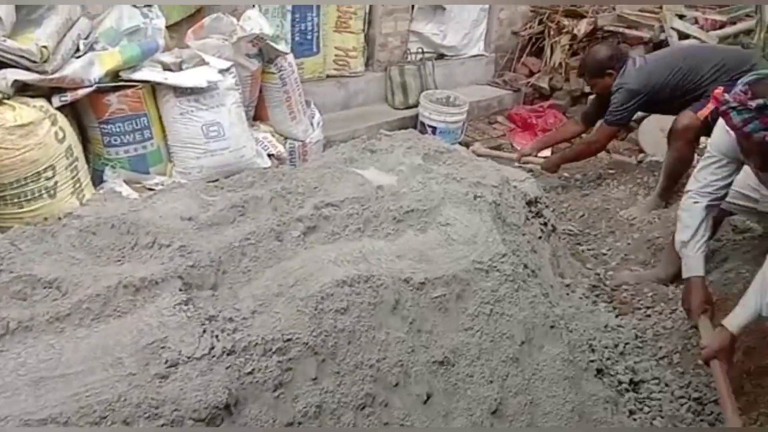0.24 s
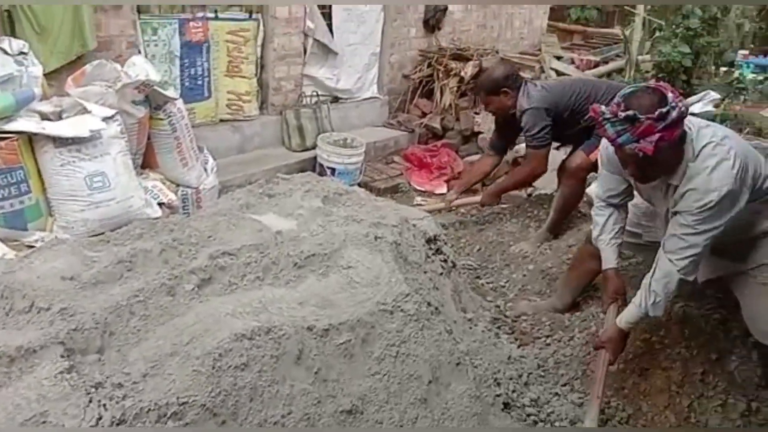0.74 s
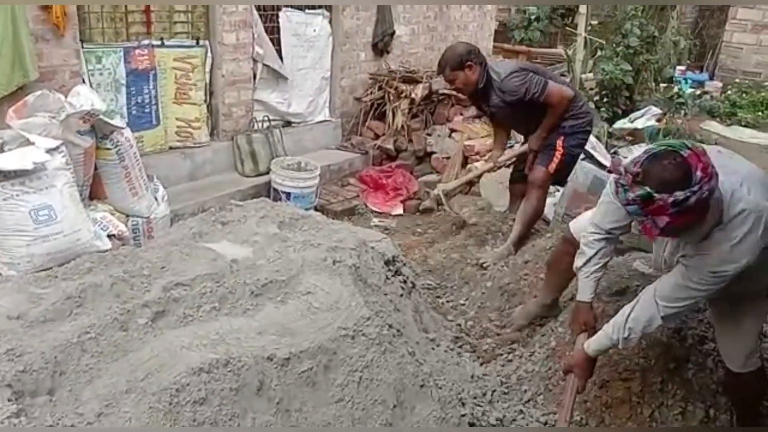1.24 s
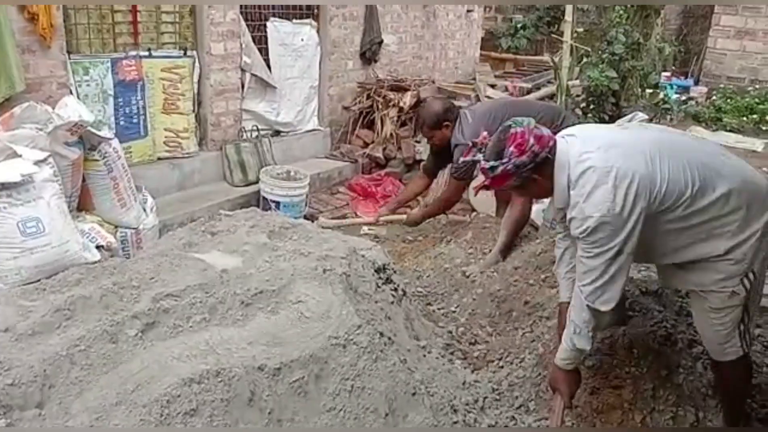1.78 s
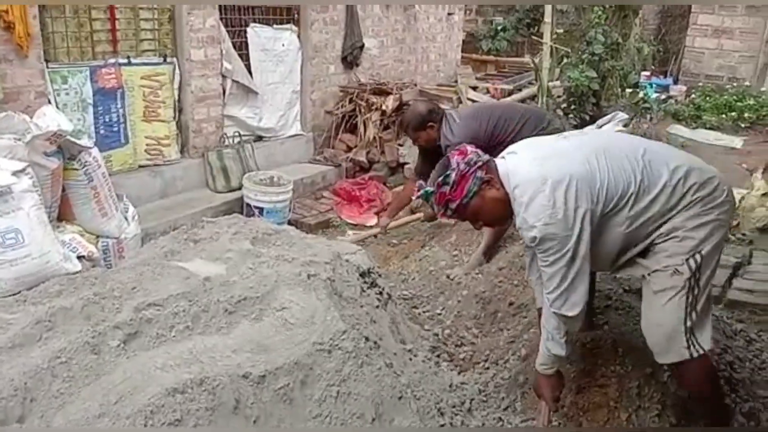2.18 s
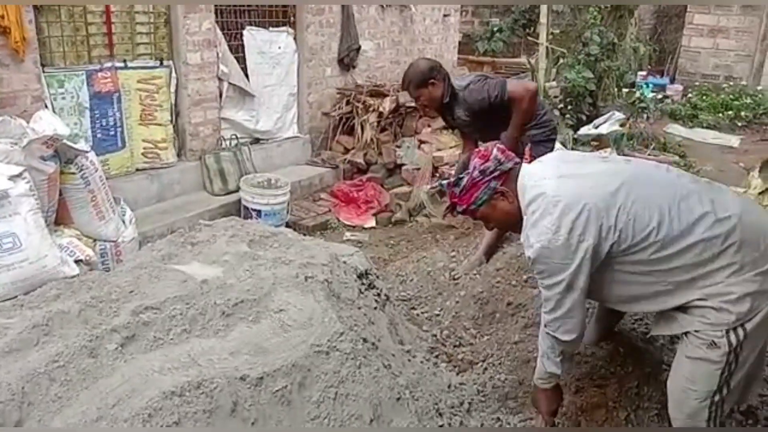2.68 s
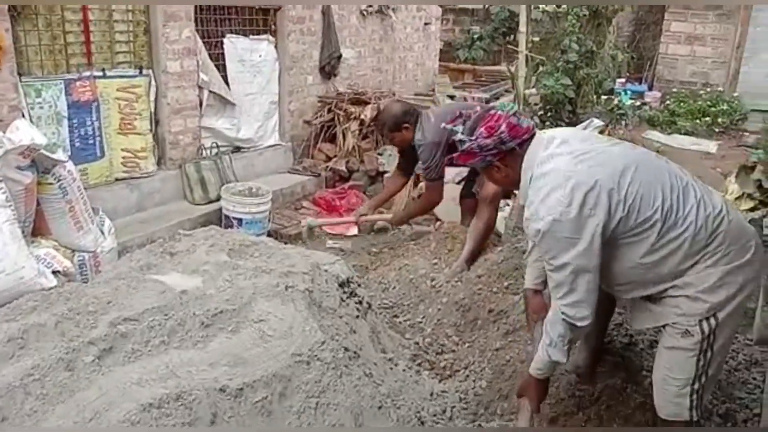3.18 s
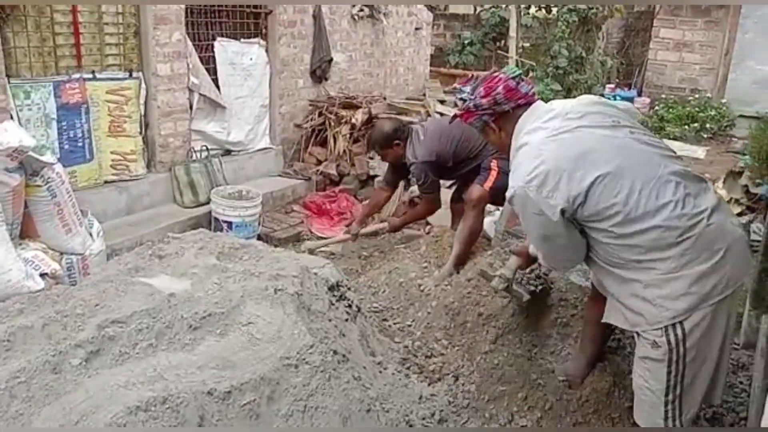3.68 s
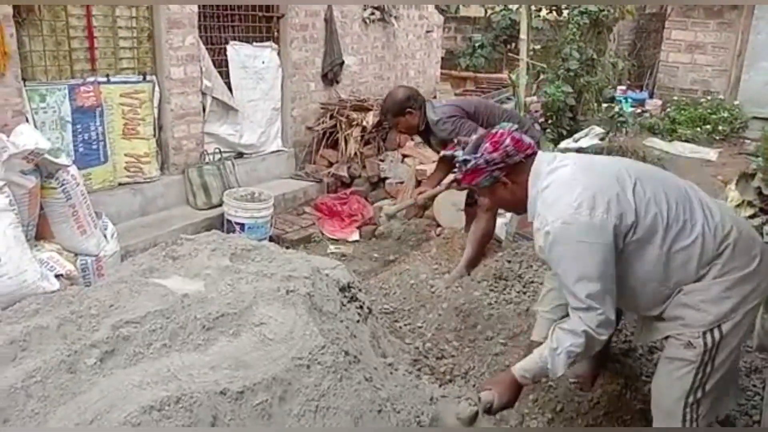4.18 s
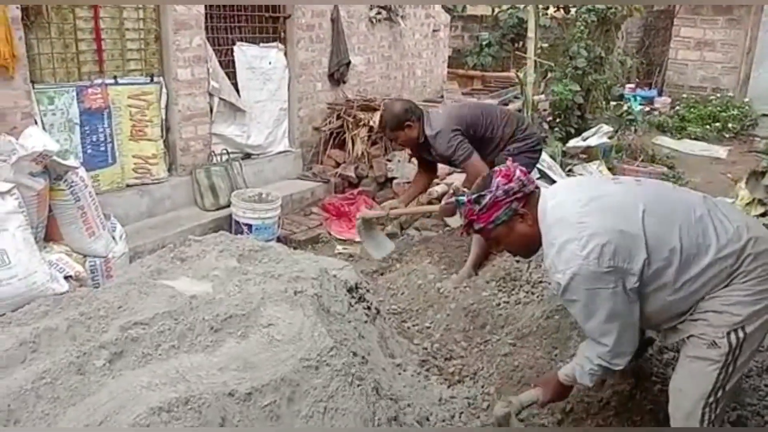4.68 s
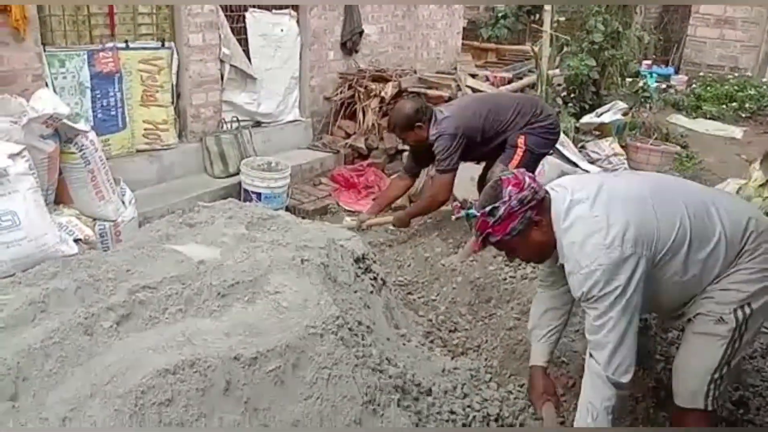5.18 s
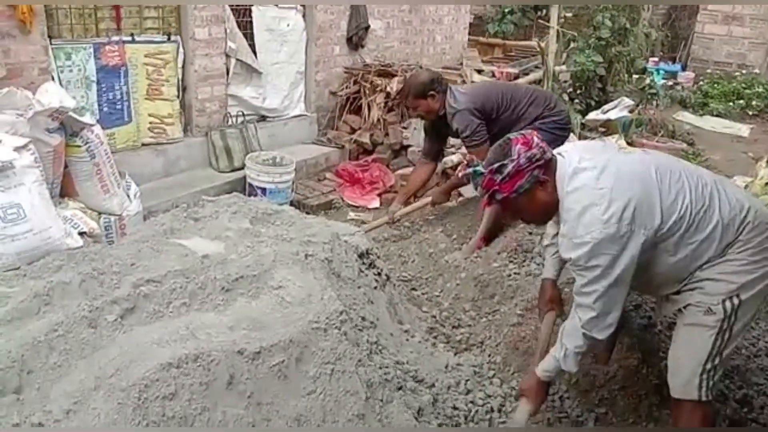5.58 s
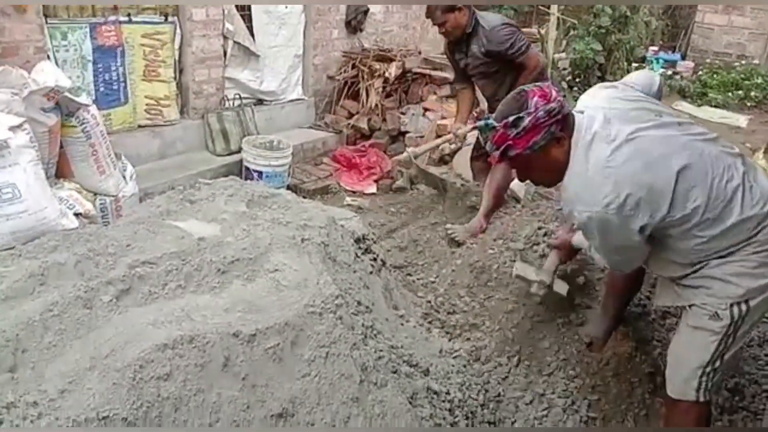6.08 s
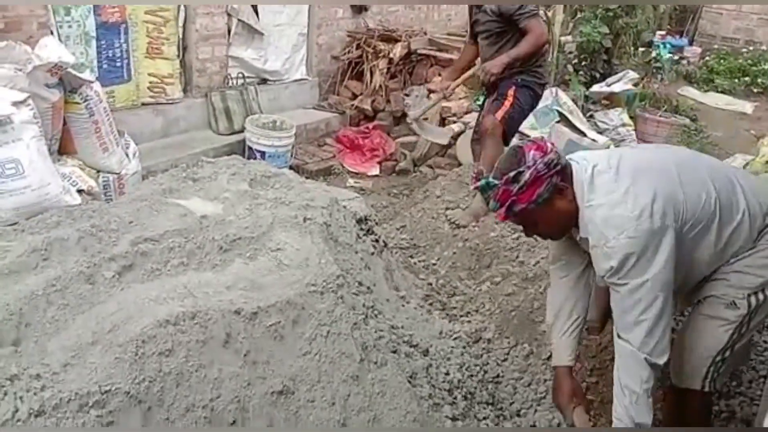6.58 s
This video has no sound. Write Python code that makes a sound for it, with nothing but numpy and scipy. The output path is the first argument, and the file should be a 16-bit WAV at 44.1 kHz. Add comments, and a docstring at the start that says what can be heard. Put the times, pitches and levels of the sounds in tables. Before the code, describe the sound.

Steel spades bite and grind through stone chips and sand in uneven strokes, with bright metallic knocks early on and gritty spills onto the heap.

```python
"""A walled yard, where two steel spades turn a heap of stone chips, sand and cement.
Each stroke bites in, grinds chips across the loaded blade (stick-slip noise through the blade's
resonances) and tips them onto the heap (dying showers of contacts), with dull blows in the ground.
Early on a bare blade is knocked three times and rings as a sum of modes; a late knock is damped.
Single chips skip on the steel, loose ones tick throughout, and the walls answer diffusely."""
import sys
import numpy as np
from scipy import signal
from scipy.fft import rfft, irfft, next_fast_len
from scipy.io import wavfile
from scipy.ndimage import uniform_filter1d, minimum_filter1d, map_coordinates

SR = 44100
rng = np.random.default_rng(int(sys.argv[2]) if len(sys.argv) > 2 else 0)


def bounce(signal):
    """Save signal as a 16-bit WAV file at the path given by the first command-line argument."""
    frames = np.transpose(np.atleast_2d(signal))
    limited = np.clip(frames, -1, 1)
    pcm = np.round(limited * 32767).astype(np.int16)
    wavfile.write(sys.argv[1], SR, pcm)


N = 301644
TIME = np.arange(N) / SR  # s


def amp(db):
    """Decibel law: the amplitude factor of a level in dB."""
    return 10 ** (np.asarray(db) / 20)


def unit(x):
    """Normalization of the power: x scaled to rms 1."""
    return x / np.sqrt(np.mean(x ** 2) + 1e-20)


def along(points, hz):
    """Logarithmic frequency scale: interpolates (frequency [Hz], value) points on it."""
    f, v = np.transpose(points)
    return np.interp(np.log(hz + 1), np.log(f + 1), v)


def wobble(rate, n):
    """Random modulation: a wandering curve through rate random knots a second."""
    knots = 1.15 * rng.standard_normal(int(n * rate / SR) + 2)
    return np.interp(np.arange(n) * rate / SR, np.arange(len(knots)), knots)


def coloured(x, gain):
    """Minimum-phase filtering: x through the causal filter with the given gain of frequency."""
    m = 2 * next_fast_len(len(x) // 2 + SR // 20)
    log_gain = np.log(np.maximum(gain(np.fft.rfftfreq(m, 1 / SR)), 1e-6))
    # folding the cepstrum onto positive times makes the filter causal
    cepstrum = irfft(log_gain)
    cepstrum[1:m // 2] *= 2
    cepstrum[m // 2 + 1:] = 0
    response = np.exp(rfft(cepstrum))
    return irfft(rfft(x, m) * response, m)[:len(x)]


def shaped(x, spectrum):
    """Spectral shaping: x filtered by (frequency [Hz], level [dB]) points."""
    return coloured(x, lambda hz: amp(along(spectrum, hz)))


def noise(spectrum, n):
    """Stationary random noise: rms 1 with the given spectrum."""
    return unit(shaped(rng.standard_normal(n), spectrum))


def add(track, s, sound):
    """Superposition: mixes a sound into the track at time s."""
    part = track[max(round(s * SR), 0):][:len(sound)]
    part += sound[:len(part)]


def contacts(n, rate, spread_db, sand_db):
    """Random impulse process: sparse stone contacts of unequal size over a wash of sand."""
    happens = rng.random(n) < rate / SR
    sign = rng.choice([-1, 1], n)
    size = amp(spread_db * np.minimum(rng.standard_normal(n), 2))
    stones = happens * sign * size
    return unit(unit(stones) + amp(sand_db) * rng.standard_normal(n))


def crumbling(ticks, t60):
    """Exponential decay: each contact crumbles into a short puff of fresh grit."""
    # twice 60 dB, because the root below halves the decay
    decay = amp(-120 * TIME[:SR // 16] / t60)
    power = signal.fftconvolve(ticks ** 2, decay)[:len(ticks)]
    return unit(np.sqrt(np.abs(power)) * rng.standard_normal(len(ticks)))


def shifting(x, width_hz, rate, depth_db):
    """Moving excitation: the contact point wanders, so ever different resonances come forward."""
    hz, t, z = signal.stft(x, SR, nperseg=1024)
    knots = rng.standard_normal((400, 64))
    grid = np.meshgrid(hz / width_hz, t * rate, indexing="ij")
    field = map_coordinates(knots, grid, mode="mirror")
    return signal.istft(z * amp(depth_db * np.clip(field, -2, 2)), SR, nperseg=1024)[1][:len(x)]


def ringing(x, t60, count):
    """Modal response: a struck body answers with many scattered modes, 600 to 8400 Hz."""
    t = TIME[:SR // 8]
    place, phase, size = rng.random((3, count, 1))
    angle = 2 * np.pi * (600 * 14 ** place * t + phase)
    modes = size ** 2 * np.sin(angle.astype(np.float32))
    return unit(signal.fftconvolve(x, modes.sum(0) * amp(-60 * t / t60))[:len(x)])


# steady background of the air in the yard: (frequency [Hz], level [dB per Hz])
AIR_SPECTRUM = [(15, -54.5), (25, -19), (101, 10.5), (879, -14), (1390, -11), (4150, -24.5), (5280, -20),
                (7280, 6.5), (15000, -32.5)]


def air():
    """Stationary random noise: a faint steady background."""
    return amp(-66) * noise(AIR_SPECTRUM, N)


# stone on stone: (frequency [Hz], level [dB per Hz])
PEBBLE_SPECTRUM = [(200, -38.5), (1500, -19.5), (4300, -21), (5600, -1.5), (7200, 0), (9000, -9.5),
                   (15000, -21.5)]


def loose_chips():
    """Random impulse process: small stones tick against each other throughout."""
    ticks = crumbling(contacts(N, rate=70, spread_db=5, sand_db=-20), t60=.04)
    return amp(-62.5) * unit(shaped(ticks, PEBBLE_SPECTRUM))


RAMP_DB = 32  # a push gains this much over its rise and loses it over its release
GRIND_GROWS, LOAD_GROWS = 0.99, 1.206  # dB of grinding and of hollow load per dB of force
GROUND_DB, GROUND_GROWS = -56.5, 0.96  # ground rumble under a full load, and its dB per dB of load
FULL_LOAD_DB = -30


def effort(pushes):
    """Power addition: the pushes rise, hold and let go, and sum to levels of four ranges.

    Returns the times and the levels of grit, grinding, hollow load and ground rumble."""
    start = max(min(s - 2 * rise for s, rise, *_ in pushes), 0)
    end = min(max(s + hold + 2 * release for s, _, hold, release, *_ in pushes), N / SR)
    t = np.arange(start, end, 1 / SR)
    power = np.full((3, len(t)), 1e-14)
    for s, rise, hold, release, db, swell_db, grind_db, load_db in pushes:
        ramp = np.maximum((s - t) / rise, 0) + np.maximum((t - s - hold) / release, 0)
        force_db = swell_db * np.clip((t - s) / hold, 0, 1) - RAMP_DB * ramp
        grind_force_db = grind_db + GRIND_GROWS * force_db
        load_force_db = load_db + LOAD_GROWS * force_db
        power += amp(db + np.array([force_db, grind_force_db, load_force_db])) ** 2
    grit, grinding, load = 10 * np.log10(power)
    ground = GROUND_DB + GROUND_GROWS * (load - FULL_LOAD_DB)
    return t, [grit, grinding, load, ground]


# chips on steel: (frequency [Hz], level [dB per Hz])
GRAVEL_SPECTRUM = [(25, -44.5), (50, -22), (85, -13), (220, -10.5), (320, -1.5), (650, -5), (2000, -2.5),
                   (3200, -0.5), (3750, -4), (4300, -6.5), (5400, 0.5), (7000, -3), (8300, -13),
                   (10200, -21.5), (14500, -20.5), (15300, -16)]


def scrape(t, levels, blade):
    """Stick-slip friction: chips catch and slip on the blade, whose resonances colour the noise."""
    slips = amp(0.66 * wobble(43.78, len(t)) + 1.2 * wobble(220, len(t)))
    force = slips * contacts(len(t), rate=800, spread_db=2.5, sand_db=3.0)
    force = unit(shifting(force, width_hz=125, rate=14, depth_db=4.6))
    force += amp(-19) * ringing(force, t60=0.2, count=70)
    # a lightly loaded blade has less of a hollow low end
    hollow_db = np.interp(levels[2].max(), [-36, -29], [-8, 0])

    def body(hz):
        """Resonance: peaks of power stand on the gravel spectrum."""
        peaks = sum(amp(db + 6.0) ** 2 / (1 + (2 * (hz - fc) / width) ** 2) for fc, width, db in blade)
        hollow = amp(along([(400, hollow_db), (600, 0)], hz))
        return amp(along(GRAVEL_SPECTRUM, hz)) * np.sqrt(1 + peaks) * hollow

    ranges = [(4200, 20000), (1000, 4200), (290, 1000), (45, 195)]  # Hz: grit, grinding, load, ground
    trims_db = [-0.8, 0.28, -3.0, 0.0]
    out = np.zeros(len(t))
    for (lo, hi), db, trim_db in zip(ranges, levels, trims_db):
        edges = lambda hz: np.sqrt((1 + (lo / (hz + 1)) ** 10) * (1 + (hz / hi) ** 20))
        band = coloured(force, lambda hz: body(hz) / edges(hz))
        out += unit(band) * amp(db + trim_db)
    return out


# hard contact of stone and steel: (frequency [Hz], level [dB per Hz])
CLASH_SPECTRUM = [(200, -49), (900, -26.5), (1300, -11), (2000, -16.5), (2900, -3), (4300, -6.5), (5200, 5),
                  (7200, 2), (8400, -10), (11000, -17), (15000, -17.5)]


def cracks(grit_db):
    """Brittle fracture: single stones crack under the blade, louder the harder it is pushed."""
    ticks = crumbling(contacts(len(grit_db), rate=99, spread_db=3, sand_db=-33), t60=0.041)
    return unit(shaped(ticks, CLASH_SPECTRUM)) * amp(grit_db - 7)


# pushes of the spades, one list for each stroke: (time of full force [s], rise [s], hold [s],
# release [s], grit level [dB], swell over the hold [dB], grinding relative to grit before trim [dB],
# hollow load relative to grit before trim [dB])
STROKE_PUSHES = [
    [(.03, .015, .05, 0.11, -37, 3, -6.5, -23), (.145, 0.025, 0.039, 0.076, -23, -0.5, -12, -22.5),
     (.18, 0.025, 0.0067, 0.14, -17.5, 9, -9.5, -13), (.26, .1, 0.12, 0.26, -20, 4.5, -4.5, -11),
     (.47, 0.16, .22, .05, -20.5, -9, -3, -9.5), (.78, 0.26, 0.084, 0.076, -36.5, 2.5, -5, -13.5),
     (.96, 0.2, 0.15, .15, -45, -11.5, -3, -5.5), (1.24, 0.16, 0.055, .25, -45, 4, 0, -15)],
    [(1.935, 0.017, 0.034, 0.13, -32, -7, -15.5, -16.5), (2.1, .12, 0.033, 0.14, -23, 2, -14.5, -19),
     (2.17, 0.12, 0.086, 0.37, -27.5, 2.5, -8.5, -14), (2.44, 0.205, .12, .2, -35, 3.5, -16.5, -40),
     (2.56, .05, 0.01, 0.13, -28, -7.5, -1, -11.5), (2.72, 0.18, .19, .08, -37, 2.5, -30, -35),
     (2.81, 0.1, .03, 0.13, -37, -5, 8.5, -5)],
    [(3.05, 0.022, .03, 0.123, -46.5, -2, -34, -51), (3.155, 0.054, 0.018, .15, -43, 0, -14.5, -40),
     (3.23, 0.18, 0.12, 0.093, -49.5, 11.5, -5.5, -36), (3.4, 0.034, .05, 0.36, -30, -4.5, -2.5, -20),
     (3.55, 0.49, 0.028, 0.13, -34, 5.5, -15, -18.5), (3.66, .16, .08, .1, -21, -1.5, -6, -18.5),
     (3.76, 0.095, 0.21, 0.086, -23, 3, -10, -16)],
    [(4.293, .02, .05, 0.053, -37.5, -4, -18.5, -36), (4.37, 0.024, 0.027, 0.29, -18.5, -3.5, -1, -10),
     (4.5, .16, .14, 0.26, -19, -0.5, -5.5, -11), (4.81, 0.109, 0.051, 0.25, -34.5, 3, -35, -51)],
    [(5.062, 0.01184, 0.009, 0.14, -42.5, -2, -36, -7), (5.17, .1, .03, 0.067, -37, -2.5, -23, -9),
     (5.208, 0.011, 0.13, 0.27, -25, 0.5, -6.5, -14), (5.44, 0.23, 0.037, 0.094, -21.5, 3, -3, -7),
     (5.55, 0.1, 0.078, 0.3, -20.5, -2.5, -1.5, -4), (5.68, 0.2, 0.17, 0.47, -23.5, -1.5, -2, -9),
     (6, 0.38, 0.099, 0.088, -26.5, -2.5, -14.5, -44), (6.16, 0.15, 0.17, 0.13, -35.5, 8.5, -3, -19),
     (6.31, .08, 0.086, 0.16, -27.5, 3, -11, -30.5)],
    [(6.54, .012, 0.018, 0.11, -42.5, -5.5, -28, -47), (6.61, .015, 0.075, 0.16, -25, 0, -6.5, -28),
     (6.68, 0.055, 0.11, .3, -24, -1, -2, -10.5)],
]
# blade resonances, one list for each stroke, as they shift with its load:
# (frequency [Hz], width [Hz], relative level [dB])
BLADE_RESONANCES = [
    [(710, 38, 1), (2460, 59, 0), (3360, 93, 0.5), (3620, 57, 3), (6020, 220, -31), (6950, 160, -2)],
    [(666, 132, -7.5), (1130, 68, 2.5), (1563, 130, 3), (3470, 63, -13), (5440, 220, -1.5), (6620, 430, 3)],
    [(674, 68, 6.5), (1155, 30, 5.5), (1480, 270, -1), (2360, 65, -3.5), (2742, 19, 7.5), (6800, 500, -1.5)],
    [(270, 110, 10), (1188, 47, 3), (2460, 100, -1.5), (2645, 84, 0.5), (3380, 240, -7), (5950, 93, -3.5),
     (7080, 92, 2.5)],
    [(291, 69, 7.5), (397, 34, -4.5), (667, 58, 5), (1260, 170, -10.5), (2720, 120, -7), (5660, 120, -10)],
    [(695, 50, -11), (1436, 120, 2), (2730, 140, -1.5), (3390, 420, 1), (5660, 240, -2.5),
     (6960, 300, -5.5)],
]
# top treble of each stroke, the early strokes brighter than the late ones: (level [dB])
SHEEN_LEVELS = [3.5, 2, 1.5, 0.5, -1, 0]


def strokes():
    """Mass loading: each stroke has its own load, and so its own blade resonances."""
    out = np.zeros(N)
    for pushes, blade, sheen_db in zip(STROKE_PUSHES, BLADE_RESONANCES, SHEEN_LEVELS):
        t, levels = effort(pushes)
        sound = scrape(t, levels, blade) + cracks(levels[0])
        add(out, t[0], shaped(sound, [(7500, 0), (10000, sheen_db)]))
    return out


def bursts(events, spectrum, gain_db, rate, ring_db):
    """Impact excitation: each event is a quickly dying shower of contacts and a little ringing."""
    out, t = np.zeros(N), TIME[:SR // 4]
    for s, db, attack, t60 in events:
        envelope = amp(-60 * t / max(t60, .01)) * (1 - np.exp(-t / attack))
        shower = contacts(len(t), rate, spread_db=-4, sand_db=5.0) * envelope
        hit = unit(shower) + amp(ring_db) * ringing(shower, t60=0.056, count=28)
        add(out, s, amp(db + gain_db) * shower.std() * unit(shaped(hit, spectrum)))
    return out


# the edge meets stones, sharply or with a crunch:
# (time [s], relative level [dB], rise time constant [s], t60 [s])
BITE_EVENTS = [(.022, -22.5, .001, .07), (.067, -14, .002, 0.099), (.135, -6, .003, .08),
               (.171, -1.5, .015, .12), (.254, -1.5, 0.0022, 0.066), (.345, 6, .015, .13),
               (.3995, -8, .0005, 0.037), (.856, -16, .001, .05), (2.661, -20.5, 0.00092, 0.035),
               (2.795, -10, .001, .045), (3.314, -19, 0.00087, 0.055), (3.392, -10.5, .0015, 0.069),
               (3.574, -7.5, 0.0036, 0.13), (3.908, -5.5, 0.0048, 0.1), (4.278, -21, 0.00059, 0.015),
               (4.293, -17, .0005, .04), (4.3205, -12.5, 0.00045, 0.022), (4.35, -6.5, .0005, 0.041),
               (4.366, 1.5, 0.0023, .1), (4.402, 1.5, .003, 0.057), (4.504, 5, 0.0037, 0.069),
               (4.549, -5, .003, 0.033), (5.057, -27, .001, 0.0555), (5.205, -4, 0.0016, 0.059),
               (5.309, 2.5, .002, .055), (5.656, -9.5, .002, .09), (5.797, 4, 0.0025, 0.049),
               (5.905, -5, 0.0022, 0.093), (6.16, -11, .001, 0.23), (6.239, -9, .0005, 0.042),
               (6.292, -4.5, 0.0065, 0.077), (6.389, 0, 0.0024, 0.054), (6.573, -21, .0005, .02),
               (6.668, -9.5, .001, 0.049), (6.743, 3, .006, 0.063)]


def bites():
    """Impact of hard bodies: the edge bites into stones in dense, bright showers."""
    return bursts(BITE_EVENTS, CLASH_SPECTRUM, gain_db=-9.0, rate=3400, ring_db=-3.0)


# spadefuls reach the heap: (time [s], relative level [dB], rise time constant [s], t60 [s])
LANDING_EVENTS = [(.022, -18, 0.0013, 0.17), (.171, -19, 0.0013, 0.12), (1.93, -25, 0.0028, 0.15),
                  (2.555, -24, 0.0015, 0.069), (2.798, -15, 0.0019, 0.15), (3.398, -28, .003, 0.29),
                  (4.37, -23, .0015, 0.2), (5.06, -39, .002, 0.13), (6.286, -12.5, 0.0044, 0.18)]
# heap struck by chips: (frequency [Hz], level [dB per Hz])
HEAP_SPECTRUM = [(200, -42), (500, -34), (680, 7.5), (860, 8.5), (1250, 4), (1900, -16.5), (4000, -34),
                 (12000, -56.5)]


def landings():
    """Impact on a granular body: a spadeful lands on the heap with a mid-range patter."""
    return bursts(LANDING_EVENTS, HEAP_SPECTRUM, gain_db=-8.5, rate=2000, ring_db=-2)


# dull blows: (time [s], relative level [dB], rise time constant [s], t60 [s])
THUD_EVENTS = [(.034, -35.5, .004, 0.11), (.172, -36.5, 0.0022, 0.15), (1.94, -46, 0.0044, 0.16),
               (2.488, -47.5, .004, 0.11), (4.6, -35, 0.0053, 0.24), (5.28, -25, .004, 0.083),
               (5.593, -32, .004, 0.11), (6.75, -44.5, 0.0047, .2)]
# low ground sound: (frequency [Hz], level [dB per Hz])
EARTH_SPECTRUM = [(25, -49.5), (48, -33.5), (78, -1), (120, -3), (190, -10), (400, -28.5), (2000, -65)]


def thuds():
    """Low-pass transmission: dull blows arrive through the ground as bass."""
    return bursts(THUD_EVENTS, EARTH_SPECTRUM, gain_db=1, rate=660, ring_db=-15.5)


# knocks on the blade, damped at once when it is buried:
# (time [s], relative level [dB], gain of modes below 4 kHz [dB], ring t60 [s])
KNOCK_EVENTS = [(0.72, -3.5, -20, 0.42), (1.027, -2.5, -13, 0.47), (1.037, -13.5, -8, 0.066),
                (1.3148, 1.5, 5.5, 0.29), (6.6017, -3, 1, .07)]
# modes of the bare blade: (frequency [Hz], relative level [dB])
STEEL_MODES = [(1160, -22), (1500, -20), (2420, -13.5), (2720, -5.5), (3045, -12), (3335, -3), (4980, -5),
               (5280, -9), (5580, -22.5), (5850, -29), (6270, -18), (6800, -5), (7080, 5.5), (7200, -1.5),
               (7400, -2.5), (9380, -5.5), (11680, -13.5), (12100, -11.5), (14100, -16)]


def knocks():
    """Modal superposition: after a hard clash the blade's modes ring on, roughened by rattling grit."""
    out, t = np.zeros(N), TIME[:SR // 2]
    for s, db, low_db, t60 in KNOCK_EVENTS:
        ring = np.zeros(len(t))
        for hz, level in STEEL_MODES:
            flutter = .8 * wobble(80, len(t)) + .45 * wobble(450, len(t))  # rad
            detuned_hz = hz * (1 + .0025 * rng.normal())
            phase = 2 * np.pi * (detuned_hz * t + rng.random()) + flutter
            mode_db = level + low_db * (hz < 4000) + 4.5 * wobble(80, len(t))
            ring += amp(mode_db) * np.sin(phase)
        rattle = unit(shifting(noise(CLASH_SPECTRUM, len(t)), width_hz=90, rate=5, depth_db=4.5))
        tail = (amp(-24.5) * ring + amp(-17.5) * rattle) * amp(-60 * t / t60)
        clash = amp(-16.0) * ring + amp(-5.5) * noise(CLASH_SPECTRUM, len(t))
        clash *= amp(-60 * t / (0.021 + 0.069 * t60))
        onset = 1 - np.exp(-t / (0.0066 * t60))
        add(out, s, amp(db) * onset * (tail + clash))
    # the knocks carry no bass below 900 Hz
    return signal.sosfilt(signal.butter(4, 900, "highpass", fs=SR, output="sos"), out)


# single chips skip on the steel: (time [s], relative level [dB], pitch [Hz])
SKIP_EVENTS = [(1.52, -42, 6800), (1.68, -43.5, 6200), (1.803, -41, 6400), (3.026, -34.5, 3300),
               (4.124, -39, 6600), (4.78, -24, 3530), (4.956, -34, 2380), (6.666, -6.5, 2900)]


def skips():
    """Narrow-band resonance: a lone chip chatters briefly around one pitch."""
    out, t = np.zeros(N), TIME[:SR // 8]
    for s, db, pitch in SKIP_EVENTS:
        resonance = lambda hz: 1 / (1 + ((hz - pitch) / (.08 * pitch)) ** 2)
        chatter = unit(coloured(rng.standard_normal(len(t)), resonance))
        envelope = amp(db - 10.0 - 60 * t / 0.094) * (1 - np.exp(-t / 0.0012))
        add(out, s, envelope * chatter)
    return out


# reverberation time of the yard: (frequency [Hz], t60 [s])
YARD_DECAY = [(200, 0.63), (2000, 0.057), (7000, 0.44), (15000, 0.21)]


def yard(x):
    """Diffuse reverberation: the brick walls answer after 5 ms with decaying noise."""
    hz, t, z = signal.stft(rng.standard_normal(SR // 2), SR, nperseg=256)
    decay = amp(-60 * t / along(YARD_DECAY, hz)[:, None])
    tail = signal.istft(z * decay, SR, nperseg=256)[1]
    delayed = np.pad(x, (SR // 200, 0))
    return signal.fftconvolve(delayed, tail / np.linalg.norm(tail))[:N]


def scene():
    """Superposition: all the work, its answer from the walls and the air."""
    work = loose_chips() + strokes() + bites() + landings() + thuds() + knocks() + skips()
    return (work + amp(-22.5) * yard(work) + air())[None]


def record(dry):
    """Gain control: the level dips once briefly, a limiter holds the peaks and the top is cut."""
    dip_db = np.interp(TIME, [5.296, 5.299, 5.306, 5.308], [0, -26, -26, 0])
    x = dry * amp(dip_db)
    needed = 1 / np.maximum(np.abs(x) / .92, 1)
    # the smallest gain nearby, smoothed over 131 samples (3 ms)
    x = x * uniform_filter1d(minimum_filter1d(needed, size=131), size=131)
    return irfft(rfft(x) * (np.fft.rfftfreq(N, 1 / SR) < 15600), N)


dry = scene()
out = record(dry)
bounce(out)
```